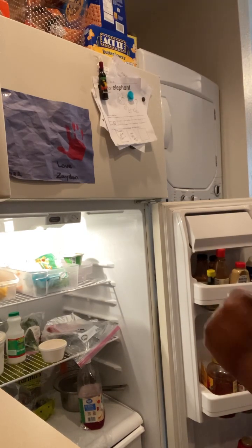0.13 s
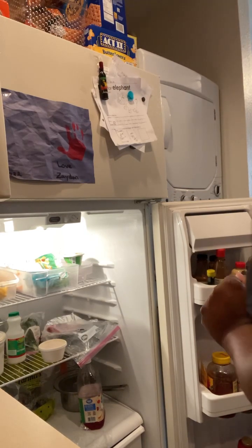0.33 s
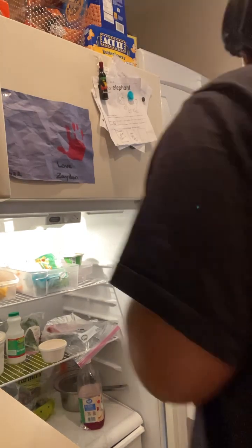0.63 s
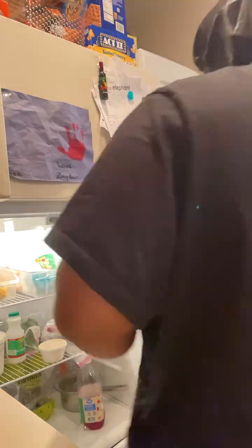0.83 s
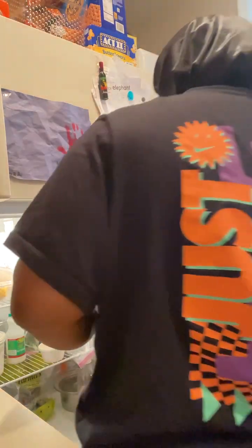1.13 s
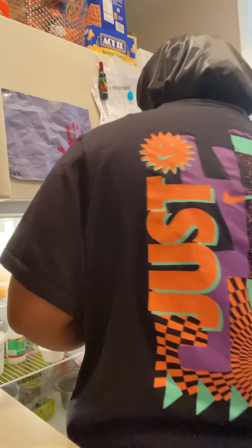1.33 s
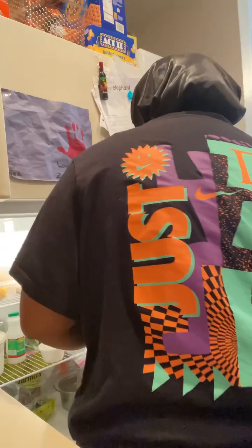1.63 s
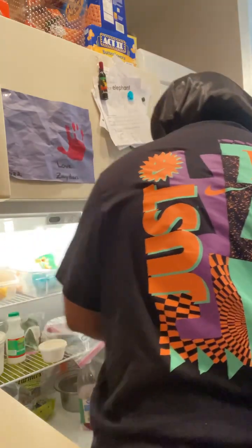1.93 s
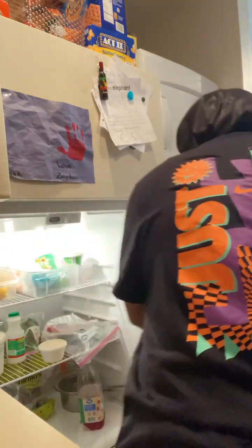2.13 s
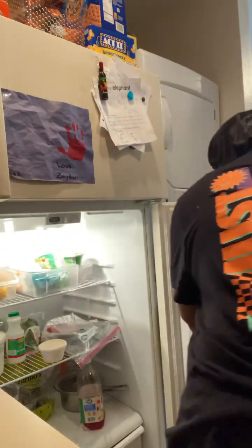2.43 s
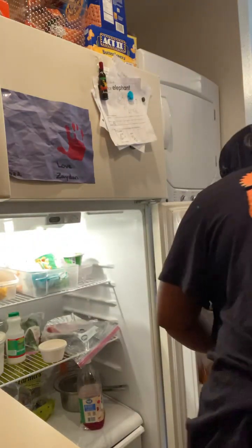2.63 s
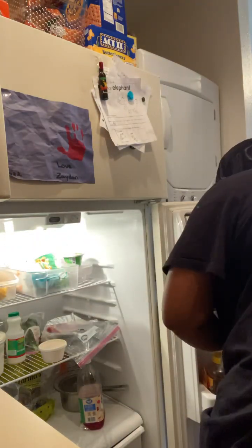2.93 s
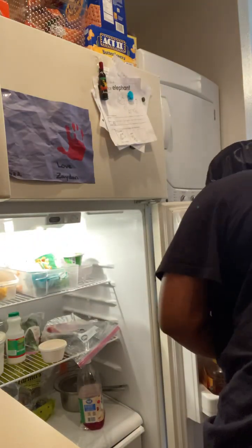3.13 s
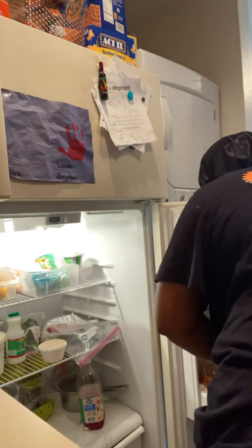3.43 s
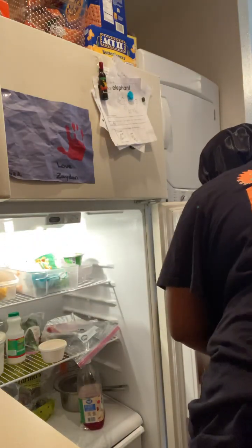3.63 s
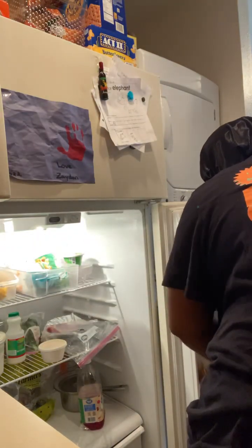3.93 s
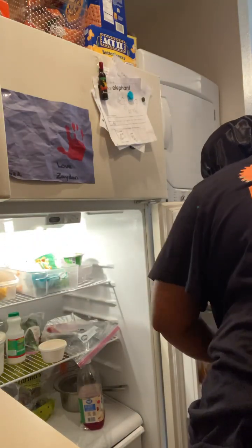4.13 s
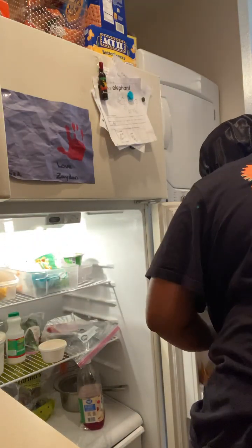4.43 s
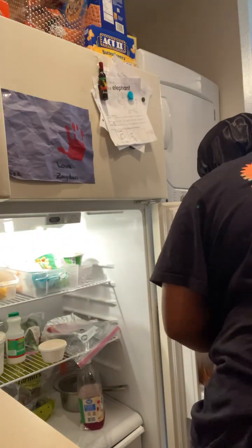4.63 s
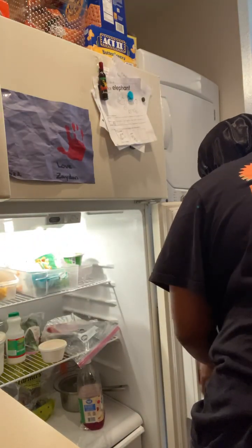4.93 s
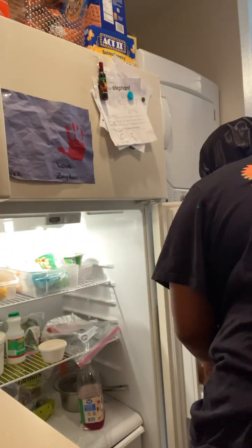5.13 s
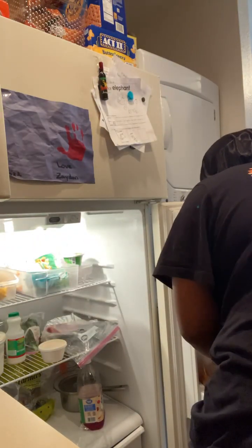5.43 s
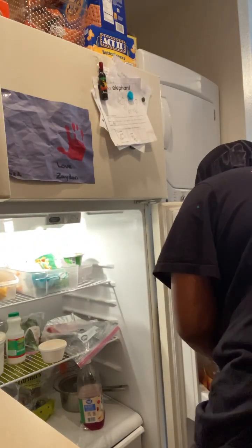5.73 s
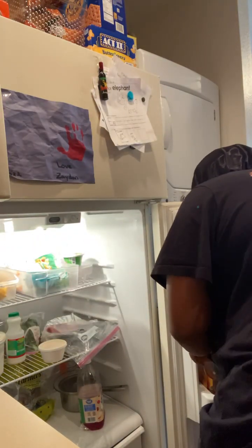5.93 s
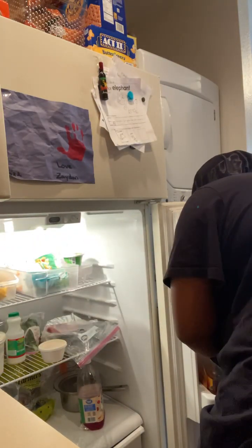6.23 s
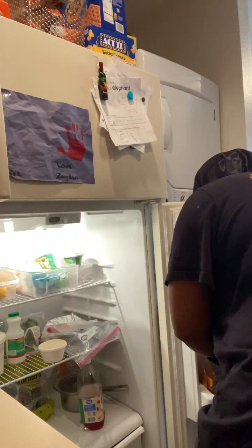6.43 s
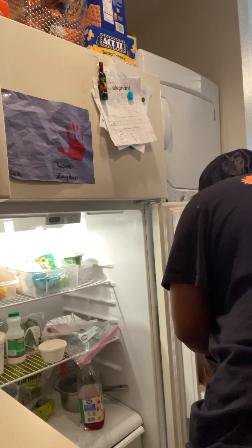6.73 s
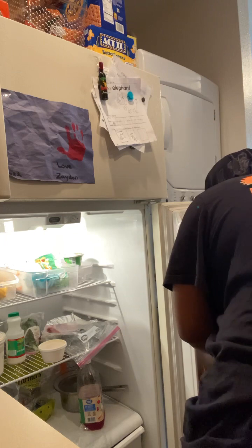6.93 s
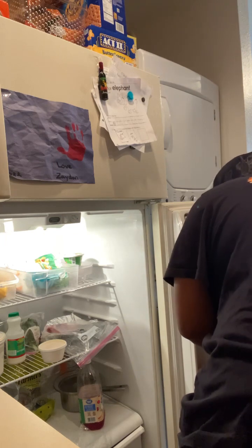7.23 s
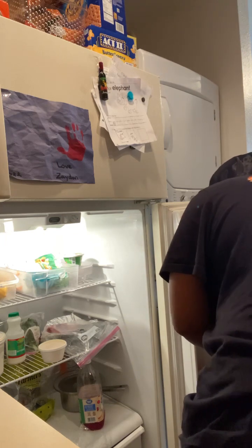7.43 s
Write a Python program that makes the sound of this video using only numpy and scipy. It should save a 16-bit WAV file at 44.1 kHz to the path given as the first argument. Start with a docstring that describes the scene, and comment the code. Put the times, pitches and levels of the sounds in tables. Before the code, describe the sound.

Close kitchen rummaging: a booming cabinet knock, container clatter, short wire-shelf scrapes, small plastic clicks and busy cloth rustle above low fridge hum.

```python
"""Rummaging in an open refrigerator

Jars and tubs drag and land on the shelves (filtered slips, struck modes), the cabinet booms (swelling sines),
bottles rattle in the door (modes), plastic and glass click and clink (band noise), a lid squeaks (a chirp).
Clothes rustle and slippers scuff (grainy noise) over a steady compressor (wavering lines, fan noise)."""
import sys
import numpy as np
from scipy import signal
from scipy.fft import rfft, irfft, next_fast_len
from scipy.io import wavfile
from scipy.ndimage import uniform_filter1d, map_coordinates

SR = 44100
rng = np.random.default_rng(int(sys.argv[2]) if len(sys.argv) > 2 else 0)


def inscribe(sig):
    """Save sig as 16-bit PCM at rate SR to the path in sys.argv[1].

    A 1-D sig is mono; a 2-D sig holds one channel per row.
    Samples are clipped to [-1, 1] before scaling.
    """
    pcm = np.round(np.clip(np.atleast_2d(sig).T, -1, 1) * 32767)
    wavfile.write(sys.argv[1], SR, pcm.astype(np.int16))


N = 335160
RING = np.arange(SR // 2) / SR  # time since a blow [s]

# left-right correlation set for diffuse noise and modes: (frequency [Hz], correlation [-1..1])
CORRELATION = [(100, 0.99), (200, 0.93), (350, 1), (640, 0), (1500, 0.31), (3800, 0.11), (7000, 1),
               (11000, 0)]
# cloth hiss spectrum: (frequency [Hz], level [dB per Hz])
CLOTH_SPECTRUM = [(500, -27), (1500, -3), (2800, -1), (4500, -0.5), (7000, -1.5), (9000, -3.5), (10800, -7),
                  (12300, -12.5)]


def amp(db):
    """Decibels to gain."""
    return 10 ** (np.asarray(db) / 20)


def unit(x):
    """Scale to rms 1."""
    return x / np.sqrt(np.mean(x ** 2) + 1e-20)


def struck(x):
    """Scale a hit to rms 1 over its first 30 ms."""
    return x / np.sqrt(np.mean(x[..., :round(0.03 * SR)] ** 2) + 1e-20)


def along(points, hz):
    """Interpolate (Hz, value) points on a log frequency axis."""
    f, v = np.transpose(points)
    return np.interp(np.log(hz + 1), np.log(f + 1), v)


def wobble(rate):
    """Smooth random curve with rate knots per second."""
    knots = rng.standard_normal(int(N * rate / SR) + 4)
    return map_coordinates(knots, [np.arange(N) * rate / SR])


def filtered(x, response):
    """Apply a frequency response by FFT."""
    n = x.shape[-1]
    m = next_fast_len(n + 8192)
    return irfft(rfft(x, m) * response(np.fft.rfftfreq(m, 1 / SR)), m)[..., :n]


def half_angle(hz):
    """Half the angle whose cosine is the left-right correlation."""
    return np.arccos(np.clip(along(CORRELATION, hz), -1, 1)) / 2


def diffuse(colour, size):
    """Coloured stereo noise of rms 1; the mid/side mix sets its correlation at each frequency."""
    def mid_side(hz):
        return colour(hz) * np.array([np.cos(half_angle(hz)), np.sin(half_angle(hz))])

    mid, side = filtered(rng.standard_normal((2, size)), mid_side)
    return unit(np.array([mid + side, mid - side]))


def noise(spectrum, size):
    """Diffuse noise with a (Hz, dB per Hz) spectrum."""
    return diffuse(lambda hz: amp(along(spectrum, hz)), size)


def fade(t60_s, attack_s):
    """Envelope of a blow: exponential onset and decay."""
    return amp(-60 * RING / t60_s) * (1 - np.exp(-RING / attack_s))


def mode(hz, t60_s, attack_s):
    """One fading resonance, its left and right phases set apart by the correlation."""
    apart = half_angle(hz) * rng.choice([-1, 1])
    phase = rng.uniform(0, 2 * np.pi) + np.array([[apart], [-apart]])
    return np.sin(2 * np.pi * hz * RING + phase) * fade(t60_s, attack_s)


def kitchen(hit, wet_db):
    """Add the hard walls' short tail: noise whose decay time depends on frequency."""
    # (frequency [Hz], t60 [s])
    decay = [(100, 0.54), (500, 0.29), (2000, 0.22), (6000, 0.26), (12000, 0.15)]
    hz, t, z = signal.stft(diffuse(np.ones_like, len(RING)), SR, nperseg=256)
    z = z * amp(-60 * t / along(decay, hz)[:, None])
    tail = signal.istft(z, SR, nperseg=256)[1][:, :len(RING)]
    tail = tail * (1 - np.exp(-RING / 0.0016))
    wet = signal.fftconvolve(hit[:1], tail, axes=1)[:, :len(RING)]
    return struck(unit(hit) + amp(wet_db) * unit(wet))


def walls(x, reflect_db=-5, count=10):
    """Early copies from the near walls, different left and right, ripple the spectrum above the bass."""
    delays_s = rng.uniform(0.002, 0.028, (2, count))
    echoes = np.array([sum(np.roll(port, int(d * SR)) * rng.choice([-1, 1]) for d in row)
                       for port, row in zip(x, delays_s)])
    return x + amp(reflect_db) / np.sqrt(count) * filtered(echoes, lambda hz: hz / (hz + 300))


def add(track, s, sound):
    """Lay a sound into the track at s seconds."""
    part = track[:, round(s * SR):][:, :sound.shape[1]]
    part += sound[:, :part.shape[1]]


def stroke(start_s, swell_s, hold_s, release_db_per_s=116.5):
    """Envelope of one movement: linear rise, hold, exponential release."""
    t = np.arange(N) / SR - start_s
    release = amp(-release_db_per_s * np.maximum(t - swell_s - hold_s, 0))
    return np.clip(t / swell_s, 0, 1) * release


def patchy(x, depth_db, bands=3, frames=14):
    """Let neighbouring bands swell and sink on their own, a few times a second."""
    z = signal.stft(x, nperseg=1024)[2]
    field = uniform_filter1d(rng.standard_normal(z.shape[1:]), bands, 0)
    field = uniform_filter1d(field, frames, 1)
    return signal.istft(z * amp(depth_db * unit(field)), nperseg=1024)[1][:, :N]


def compressor(air_db=-44, waver_db=2.0):
    """Motor and mains lines waver in level and phase over the noise of the fan."""
    # motor lines: (frequency [Hz], median level [dB rms])
    motor_lines = [(60, -58), (120.1, -43.5), (149, -58), (240.3, -51), (356, -61), (411, -67),
                   (509, -66.5), (840, -70), (961, -72.5)]
    # fan noise: (frequency [Hz], level [dB per Hz])
    air_spectrum = [(20, -20), (30, -8), (45, -1.5), (62, 6.5), (85, -2), (115, 1.5), (160, -7), (250, -6),
                    (300, -15), (370, -9.5), (520, -14), (700, -17.5), (800, -22.5), (875, -17),
                    (1000, -25), (1300, -27), (2500, -34), (6000, -42.5), (12000, -60)]
    t = np.arange(N) / SR
    hum = np.zeros(N)
    for hz, db in motor_lines:
        level = np.sqrt(2) * amp(db + waver_db * wobble(5))
        phase = 0.39 * wobble(4.2) + rng.uniform(0, 2 * np.pi)
        hum += level * np.sin(2 * np.pi * hz * t + phase)
    air = unit(patchy(walls(noise(air_spectrum, N)), depth_db=2.0))
    return hum + amp(air_db + 0.24 * wobble(2.9)) * air


def crackle(rate_hz=90, spread_db=4):
    """Creases snap at random, mostly weakly: sparse impulses through short cloth noise, rms 1."""
    sizes_db = spread_db * np.minimum(rng.exponential(size=N), 4)
    snaps = (rng.random(N) < rate_hz / SR) * amp(sizes_db)
    ring = noise(CLOTH_SPECTRUM, len(RING)) * fade(0.031, 0.00033)
    return unit(signal.fftconvolve(snaps[None], ring, axes=1)[:, :N])


def rubbing(hiss_db=-1.14, scuff_db=-1, grain_db=0.5, catch_db=0.86, grit_db=1.45, crackle_db=-9.5):
    """Fibres catch and slip in tiny grains: bright cloth hiss over duller sole scuff."""
    # movements: (start [s], swell [s], hold [s], cloth level [dB before hiss_db], sole level [dB before scuff_db])
    movements = [(0.087, 0.057, .02, -63, -70), (0.45, 0.082, 0.31, -79, -59),
                 (0.828, 0.039, 0.083, -38.5, -40), (1.024, 0.051, 0.025, -45, -45.5),
                 (1.066, 0.15, 0.19, -49, -42.5), (1.378, 0.072, 0.15, -46, -39),
                 (1.84, 0.059, 0.092, -55.5, -46.5), (2.085, 0.047, 0.025, -75, -47.5),
                 (2.142, 0.055, 0.12, -45.5, -53), (2.264, 0.076, 0.039, -41.5, -46),
                 (2.393, 0.075, 0.078, -41.5, -49), (2.566, 0.036, 0.3, -49.5, -70),
                 (2.906, 0.16, 0.036, -37, -38), (3.106, 0.035, 0.23, -43, -39.5),
                 (3.408, .12, 0.037, -40.5, -42), (3.594, 0.025, 0.19, -76, -51),
                 (3.833, .1, 0.12, -49.5, -54), (4.15, 0.057, 0.078, -48.5, -57),
                 (4.315, 0.033, 0.21, -64, -55.5), (4.922, 0.038, 0.13, -43.5, -49),
                 (5.096, .07, 0.014, -35.5, -38.5), (5.295, 0.088, 0.029, -35, -35.5),
                 (5.513, 0.041, 0.19, -48.5, -45.5), (5.675, 0.065, 0.012, -43.5, -41.5),
                 (5.99, 0.058, 0.044, -60.5, -56), (6.12, 0.092, 0.23, -55, -51),
                 (6.519, 0.12, 0.036, -44.5, -50.5), (6.805, 0.08, 0.031, -52, -54),
                 (6.935, 0.023, 0.026, -35.5, -35.5), (7.051, 0.12, 0.07, -43.5, -40),
                 (7.336, 0.044, 0.11, -49.5, -48.5), (7.511, 0.043, .03, -46.5, -57)]
    # sole noise: (frequency [Hz], level [dB per Hz])
    scuff_spectrum = [(100, 4.5), (250, 3), (500, 3.5), (850, 4.5), (1300, -0.5), (2100, 0), (3000, -7.5),
                      (6000, -26)]
    # open cabinet colouring the rubbing: (frequency [Hz], width [Hz], lift [dB])
    cavity_modes = [(506, 52, 5), (824, 75, 3), (1220, 110, 5), (1677, 27, 2.5), (2180, 31, 5),
                    (2650, 54, 3), (3620, 370, 2.5), (4080, 390, 2)]
    fidget_db = [[-65.5], [-63]]  # cloth, soles: faint rubbing between strokes, before the trims

    power = sum((amp([[cloth_level], [sole_level]]) * stroke(start_s, swell_s, hold_s)) ** 2
                for start_s, swell_s, hold_s, cloth_level, sole_level in movements)
    hiss, scuff = np.sqrt(power + amp(fidget_db) ** 2)

    def grains(depth_db):
        return unit(amp(depth_db * wobble(350) + catch_db * wobble(45)))

    def cavity(f):
        return amp(sum(db / (1 + (2 * (f - hz) / width) ** 2) for hz, width, db in cavity_modes))

    fibres = grains(grain_db) * unit(walls(noise(CLOTH_SPECTRUM, N)))
    cloth = amp(hiss_db) * hiss * unit(fibres + amp(crackle_db) * crackle())
    soles = amp(scuff_db) * scuff * grains(grit_db) * unit(walls(noise(scuff_spectrum, N)))
    return filtered(cloth + soles, cavity)


def slides(rate_hz=320, spread_db=2.0):
    """A container's base sticks and slips over the wire shelf; each slip is a tiny tap that rings the wires."""
    # drags: (start [s], swell [s], hold [s], level [dB])
    drags = [(1.21, 0.03, 0.33, -48), (3.47, 0.022, 0.11, -45.5), (5.142, 0.015, 0.04, -43.5),
             (5.31, 0.031, 0.07, -43.5), (6.945, 0.02, 0.043, -38), (7.182, 0.04, 0.036, -62)]
    # resonances of the wires: (frequency [Hz], width [Hz], level [dB])
    wire_modes = [(924, 63, -1.5), (1157, 110, -4.5), (1630, 62, -2), (1940, 84, -2.5), (2190, 71, 2),
                  (2400, 54, -6), (3120, 110, -5.5), (3630, 180, -8.5), (4230, 240, -8)]
    signs = rng.choice([-1, 1], N)
    sizes_db = spread_db * np.minimum(rng.exponential(size=N), 3)
    slips = (rng.random(N) < rate_hz / SR) * signs * amp(sizes_db)

    def wires(f):
        return sum((-1) ** k * amp(db) * 1j * f * width / (hz * hz - f * f + 1j * f * width)
                   for k, (hz, width, db) in enumerate(wire_modes))

    drag = sum(amp(db) * stroke(start_s, swell_s, hold_s) for start_s, swell_s, hold_s, db in drags)
    return drag * unit(walls(filtered(np.array([slips, slips]), wires), reflect_db=5.5))


def contacts(shift=0.06, rock_s=0.012, rock_loss_db=2):
    """A rocking container lands in ever weaker contacts; its note shifts a little as it tilts."""
    # landings: (time [s], relative level [dB], hard edge [dB re level, before trim], edge corner [Hz],
    # hollow note [Hz], note level [dB re level, before trim], note t60 [s], contacts [count])
    landings = [(1.470, -23, -3.5, 6000, 321, 7.5, 0.079, 1), (1.475, -23, -3.5, 9000, 242, 6.5, 0.12, 1),
                (1.486, -24.5, -7.5, 9000, 419, 2.5, 0.083, 2), (1.497, -30, -4, 9000, 202, 6, 0.08, 2),
                (1.523, -36, 1, 3000, 562, -2, 0.1, 1), (1.566, -36.5, -5, 3000, 402, 5, 0.068, 1),
                (1.615, -45.5, -2, 4000, 330, -2, 0.13, 1), (1.886, -42, -15, 2520, 430, -14, 0.16, 1),
                (1.916, -41, -6, 3000, 427, 3.5, 0.046, 1), (1.927, -40, -8, 3000, 258, 8, 0.11, 1),
                (1.948, -44, -11, 2500, 335, 8, 0.066, 1), (2.390, -40, -11, 4000, 332, -8, 0.068, 1),
                (2.437, -47, -13, 4000, 360, 5, 0.071, 1), (2.922, -50.5, 3.5, 2600, 968, 4, 0.14, 1),
                (3.170, -36, -9, 1500, 398, 2, 0.11, 1), (3.203, -34.5, 4.5, 2800, 580, 6.5, 0.092, 1),
                (3.209, -28.5, -3.5, 2800, 777, 6, 0.076, 1), (3.230, -31, 0, 3000, 429, 10, 0.11, 1),
                (3.239, -36, -3, 2800, 523, 8, 0.085, 1), (3.262, -43, -7, 2500, 497, 3, 0.08, 1),
                (3.303, -37, -3, 7000, 500, 4, 0.1, 1), (3.338, -40.5, -17, 2600, 495, 4.5, 0.1, 1),
                (3.372, -36.5, -9, 2600, 441, 3, 0.049, 1), (4.360, -52.5, -11, 2500, 1130, 0, 0.092, 1),
                (4.510, -46.5, -4.5, 3500, 502, 0, 0.12, 1), (5.146, -43, 10.5, 3000, 872, 11.5, 0.099, 1),
                (5.172, -45, 7, 6000, 530, 0, 0.068, 2), (5.395, -35, -2.5, 4000, 756, -4, 0.088, 1),
                (5.412, -37.5, -11, 2500, 828, -1, 0.11, 1), (5.462, -36.5, -9, 2500, 473, -11, 0.08, 1),
                (5.486, -40.5, -6, 2500, 341, -3, 0.086, 2), (5.730, -39.5, -1.5, 3000, 418, 2.5, 0.14, 1),
                (5.732, -43.5, -5, 3000, 910, 8.5, 0.14, 1), (5.966, -42, -8.5, 900, 532, -1, 0.16, 1),
                (6.203, -50.5, 7.5, 2000, 560, 1, 0.12, 2), (6.228, -46.5, 4, 2000, 1400, 4, 0.08, 1),
                (6.241, -41, 3, 2400, 1064, 7.5, 0.085, 1), (6.245, -41.5, 0, 5000, 541, 7.5, 0.11, 1),
                (6.310, -44, -2, 1400, 472, 0, 0.13, 1), (6.404, -39.5, -10, 2500, 492, 3, 0.08, 1),
                (6.94, -56, 0, 5000, 620, -10, 0.08, 1), (6.985, -47, 5, 7000, 402, -10, 0.08, 1),
                (7.028, -36.5, -20, 3000, 430, -5, 0.073, 1),
                (7.235, -39.5, -10, 3000, 520, -2.5, 0.099, 1)]
    for s, db, hard_db, dull_hz, note_hz, hollow_db, note_t60_s, count in landings:
        for k in range(round(count)):
            tilted_hz = note_hz * np.exp(k * shift * rng.standard_normal())
            yield s + k * rock_s, db - k * rock_loss_db, hard_db, dull_hz, tilted_hz, hollow_db, note_t60_s


def knocks(shelf_db=-2.0, note_db=-4.0, edge_db=-1.3, give_s=0.005, heavy_db=-18, lightness=0.099, right_db=0.44):
    """Each contact rings the shelf at new strengths, sounds the container's note and crunches as the rack gives."""
    # shelves and liner: (frequency [Hz], level [dB before weight and scatter], t60 [s])
    shelf_modes = [(175.4, 3, 0.27), (218, 0.5, 0.16), (245.6, 6, 0.14), (284, -1, 0.18), (333.4, 2, 0.17),
                   (401, -1, 0.32), (444, 0.5, 0.19), (567.3, 1, 0.17), (688, -4, 0.3), (789, -7, 0.21),
                   (860, -7.5, 0.18), (918, -8, 0.26), (1203, -12, 0.24), (1357, -10, 0.16),
                   (1697, -18, 0.33), (1924, -13, 0.3), (2180, -14, 0.28), (2435, -32, 0.3)]
    # hard edge noise: (frequency [Hz], level [dB per Hz])
    edge_spectrum = [(200, -14), (600, 8), (1000, 5), (2000, 1), (3000, -3.5), (5000, -10.5), (8000, -18),
                     (12000, -38)]
    out = np.zeros((2, N))
    for s, db, hard_db, dull_hz, note_hz, hollow_db, note_t60_s in contacts():
        # a light touch barely moves the low modes and settles more gradually
        bass_db = lightness * (db - heavy_db)
        settle = amp(-bass_db)
        shelf = np.zeros((2, len(RING)))
        for hz, level_db, t60_s in shelf_modes:
            strength = amp(level_db + bass_db * 200 / hz + rng.normal(0, 2.3))
            shelf += strength * mode(hz * (1 + rng.normal(0, 0.006)), t60_s, 0.0036)
        note = mode(note_hz, note_t60_s, 0.00072 * settle)

        def edge(f):
            return amp(along(edge_spectrum, f)) / np.sqrt(1 + (f / dull_hz) ** 4)

        crack = diffuse(edge, len(RING)) * fade(0.077, give_s * settle)
        hit = amp(shelf_db) * kitchen(shelf, wet_db=-6.5)
        hit = hit + amp(note_db + hollow_db) * kitchen(note, wet_db=-9.5)
        crunch = amp(edge_db + hard_db) * kitchen(crack, wet_db=-1.5)
        add(out, s, amp(db) * (amp([[-right_db], [right_db]]) * hit + crunch))
    return out


def thuds(overtone_db=-15, gain_db=2):
    """Heavy pushes set cabinet and door panels swelling from rest into a low boom with one overtone."""
    # pushes: (time [s], level [dB before gain_db], pitch [Hz], swell time [s])
    pushes = [(1.483, -24, 176.5, 0.021), (1.473, -8, 110, 0.026), (1.475, -21, 70.6, 0.055),
              (1.528, -16, 104, 0.023), (1.570, -13, 108, 0.024), (1.625, -25.5, 85, 0.029),
              (1.921, -15, 117.7, 0.04), (1.925, -23.5, 73.5, 0.044), (1.922, -21.5, 189, 0.01),
              (2.377, -34.5, 92, 0.03), (2.517, -29, 102.7, 0.052), (3.206, -16.5, 76, 0.033),
              (3.200, -22.5, 203, 0.012), (3.227, -23, 178.3, 0.029), (3.309, -23, 88, 0.014),
              (3.370, -30, 128, 0.017), (5.141, -28.5, 112, 0.054), (5.142, -33, 69.5, 0.029),
              (5.412, -30.5, 112.7, 0.06), (5.721, -33.5, 135, 0.015), (5.960, -35.5, 180, 0.018),
              (6.255, -31, 75.6, 0.037), (7.460, -25.5, 113.2, 0.04)]
    out = np.zeros((2, N))
    for s, db, hz, swell_s in pushes:
        swell = (RING / swell_s * np.exp(1 - RING / swell_s)) ** 3
        boom = np.sin(2 * np.pi * hz * RING) * fade(0.5, 0.0022)
        boom = boom + amp(overtone_db) * mode(hz * 1.5, 0.87, 0.002)
        add(out, s, amp(db + gain_db) * swell * boom)
    return out


def ticks():
    """Short clicks and clinks of plastic and glass: each one resonance of band noise, drawn out by the room."""
    # (time [s], level [dB], pitch [Hz], t60 [s], resonance sharpness [-])
    clicks = [(1.478, -35, 2040, 0.23, 9), (1.485, -36, 1700, 0.27, 34), (2.844, -48, 8350, 0.15, 2.2),
              (3.456, -34.5, 3600, 0.14, 2.2), (4.183, -54, 6040, 0.22, 1.5),
              (4.440, -54.5, 4500, 0.33, 1.3), (4.828, -54.5, 4160, 0.21, 1.7),
              (6.051, -61, 3700, 0.17, 2.9), (6.243, -49.5, 3700, 0.12, 2.6),
              (6.312, -49.5, 4250, 0.22, 1.7), (6.328, -53, 4600, 0.1, 1.8), (6.405, -49, 3620, 0.24, 4.5),
              (6.406, -53, 1960, 0.1, 14), (6.802, -43.5, 4400, 0.18, 1.65), (6.979, -38, 3970, 0.3, 2.1)]
    out = np.zeros((2, N))
    for s, db, hz, t60_s, sharpness in clicks:
        def peak(f):
            return 1 / (1 + (sharpness * np.log((f + 1) / hz)) ** 4)

        click = diffuse(peak, len(RING)) * fade(t60_s, 0.0026)
        add(out, s, amp(db) * kitchen(click, wet_db=-7.5))
    return out


def rattles(attack_s=0.00091):
    """Bottles tap the door rack; each contact's brightness tilts the rack modes."""
    # (time [s], level [dB], brightness [dB per octave])
    taps = [(3.205, -38, 2), (3.223, -43, -2), (3.240, -41, -8), (3.300, -42, 5.5), (3.313, -47, 5),
            (3.347, -64, 0), (3.390, -51, -8), (5.468, -44, 12), (5.735, -47, 2), (6.206, -49, -9),
            (6.236, -43.5, 3), (6.246, -48, -10), (6.312, -55, -12), (6.406, -54, 3)]
    # rack and bottles: (frequency [Hz], level [dB before tilt and scatter], t60 [s])
    rack_modes = [(1080, 0, 0.12), (1400, -3, 0.15), (1530, -12, 0.12), (2010, 2, 0.15), (2195, -7.5, 0.14),
                  (2444, -14.5, 0.15), (3090, -16, 0.12), (3400, -9, 0.15)]
    out = np.zeros((2, N))
    for s, db, bright_db in taps:
        ring = np.zeros((2, len(RING)))
        for hz, level_db, t60_s in rack_modes:
            strength = amp(level_db + bright_db * np.log2(hz / 1000) + rng.normal(0, 3.3))
            ring += strength * mode(hz * (1 + rng.normal(0, 0.016)), t60_s, attack_s)
        add(out, s, amp(db) * kitchen(ring, wet_db=-2))
    return out


def squeak(time_s=3.567, length_s=0.034, level_db=-38.5, start_hz=4150, end_hz=3250, rough=0.105):
    """A tight lid slips, plastic on plastic, with a short, rough, falling chirp."""
    hz = np.interp(RING, [0, length_s], [start_hz, end_hz])
    hz = hz * (1 + rough * wobble(1490)[:len(RING)])
    envelope = np.sqrt(np.clip(1 - RING / length_s, 0, 1))
    chirp = np.sin(2 * np.pi * np.cumsum(hz) / SR) * envelope
    out = np.zeros((2, N))
    add(out, time_s, amp(level_db) * kitchen(np.array([chirp, chirp]), wet_db=-3))
    return out


def scene():
    """Everything at the refrigerator."""
    return compressor() + rubbing() + slides() + knocks() + thuds() + ticks() + rattles() + squeak()


def record(dry, top_hz=11950):
    """Split the level difference between the ports by frequency and cut steeply above top_hz."""
    # (frequency [Hz], left minus right [dB])
    port_balance = [(30, -0.5), (120, -2), (200, -2.5), (280, -8), (370, -10.5), (480, -7), (700, -0.5),
                    (1100, -1.5), (2200, 2.5), (4000, 1.5), (9000, 0)]

    def response(hz):
        balance = amp(along(port_balance, hz) * np.array([[0.5], [-0.5]]))
        return balance / np.sqrt(1 + (hz / top_hz) ** 80)

    return filtered(dry, response)


dry = scene()
out = record(dry)
inscribe(out)
```